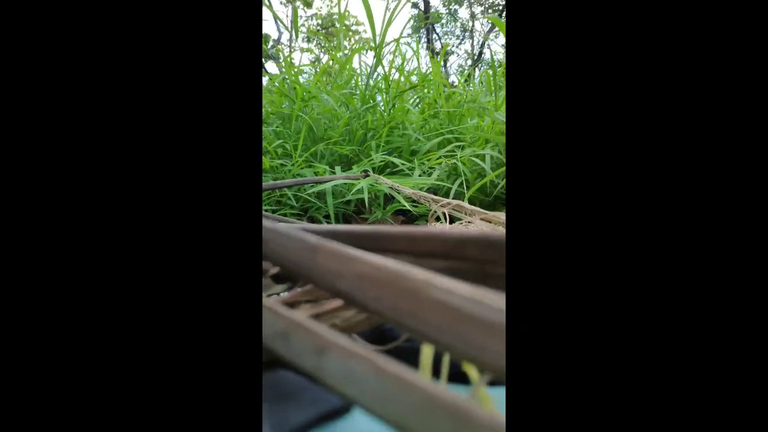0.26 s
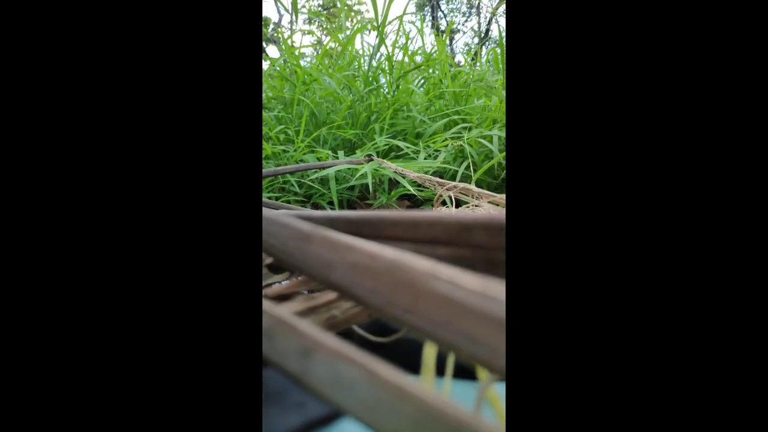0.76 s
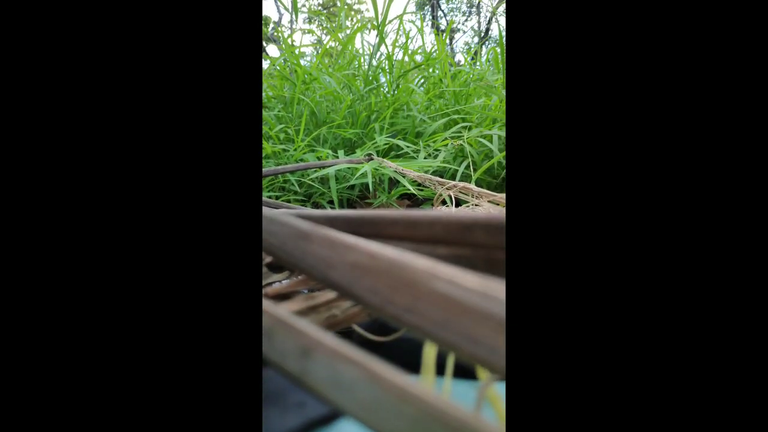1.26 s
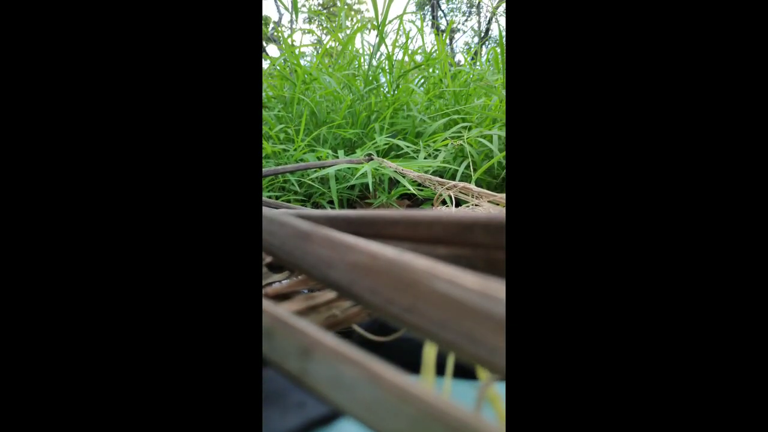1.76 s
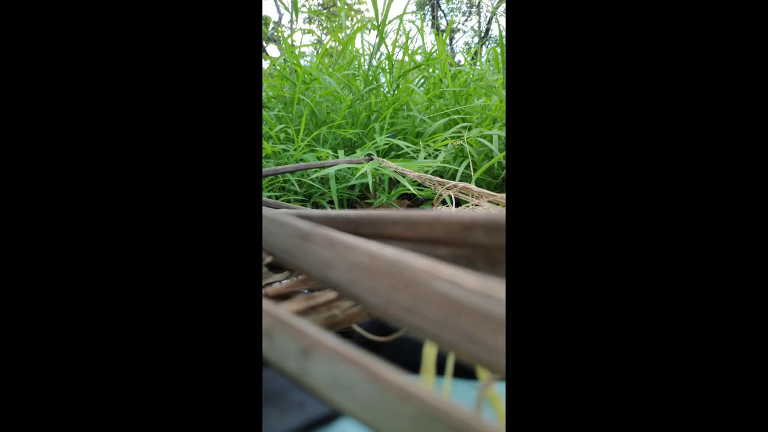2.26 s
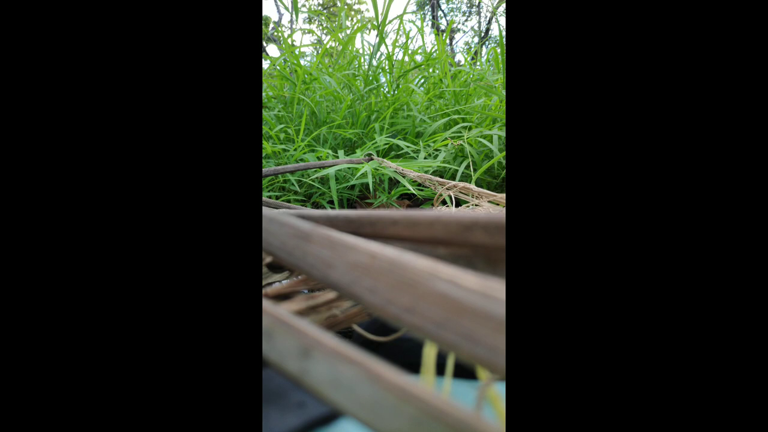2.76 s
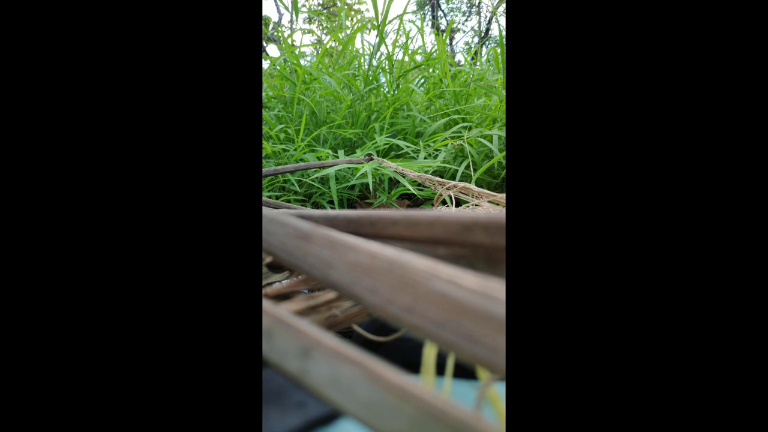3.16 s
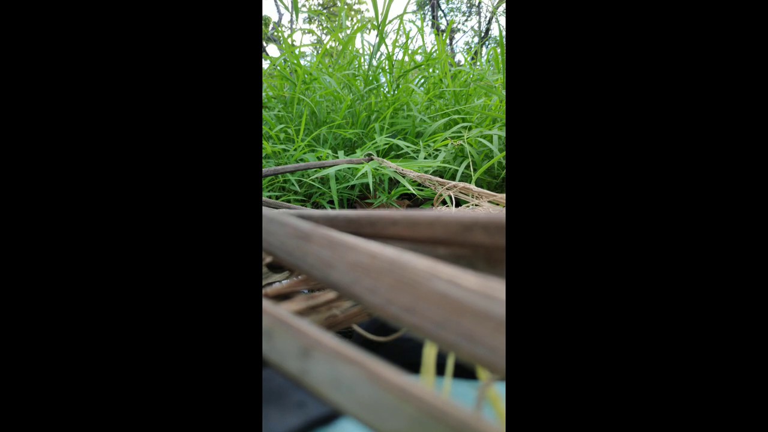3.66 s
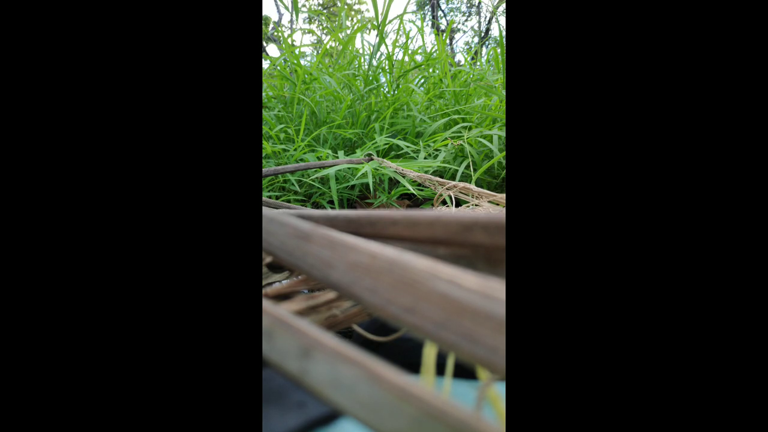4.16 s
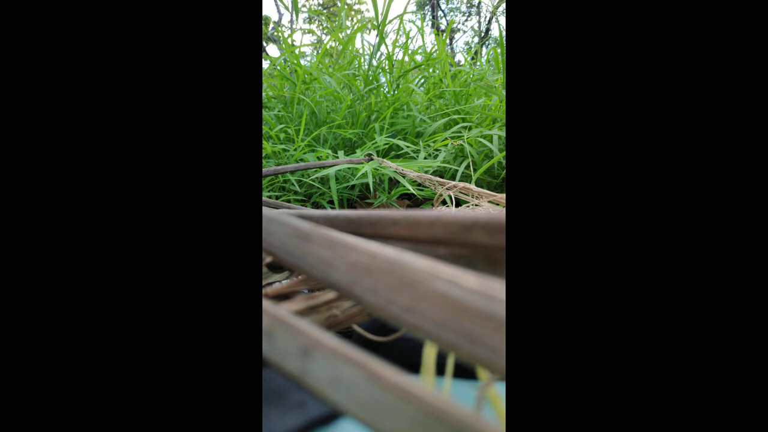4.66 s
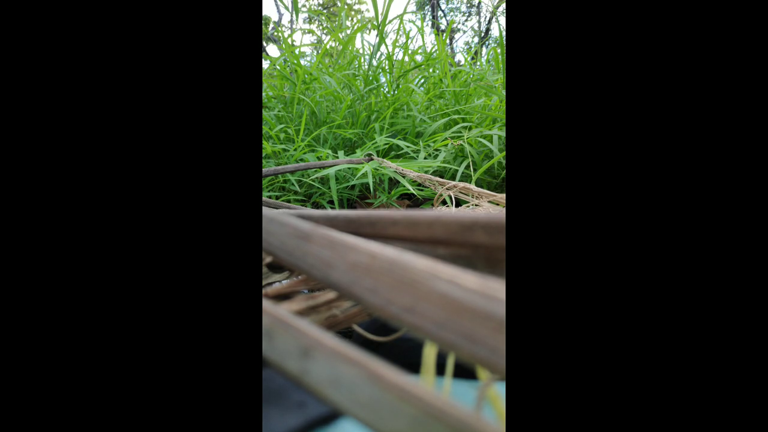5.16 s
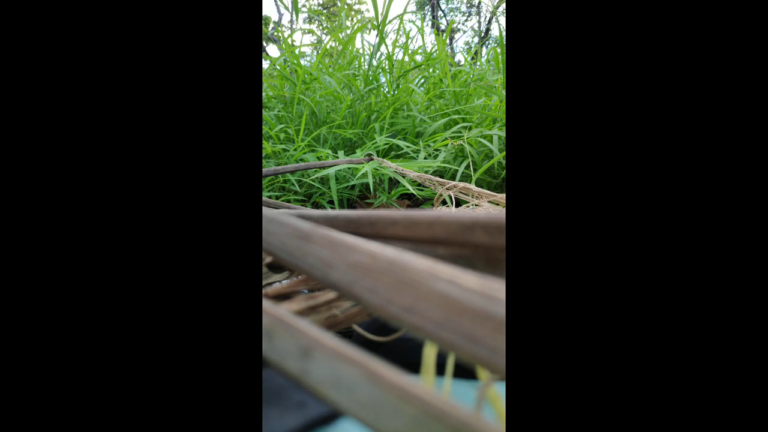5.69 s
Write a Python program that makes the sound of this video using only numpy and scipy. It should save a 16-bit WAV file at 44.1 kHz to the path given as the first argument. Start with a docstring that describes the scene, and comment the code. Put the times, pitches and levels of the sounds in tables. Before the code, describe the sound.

Bright, brittle leaf rustling at very close range, mostly left. After a brief squeaky brush and a small tap on the right, it stays faint, then surges in irregular strokes with sharp cracks and short woody knocks. Soft dull bumps come after 3 seconds. Movement dwindles to a few last clicks, leaving quiet outdoor hiss, low rumble and a thin insect buzz on the right.

```python
"""Dry palm fronds and grass are dragged about right beside the left port of a handheld microphone, outdoors.
Uneven bursts of noise make the sliding blades crackle; short tears of noise make blades snap and stalks knock.
A blade squeaks at the start with wavering harmonics, and one pressure pulse taps the right port.
Soft low sines bump under the heavy fronds. The movement dies away into a few last ticks.
Coloured noise makes the quiet open air, and narrow fluttering noise a faint insect."""
import sys
import numpy as np
from scipy import signal
from scipy.fft import rfft, irfft, next_fast_len
from scipy.io import wavfile

SR = 44100
rng = np.random.default_rng(int(sys.argv[2]) if len(sys.argv) > 2 else 0)


def to_wav(s):
    """Save 16-bit WAV."""
    ch = np.atleast_2d(s).T  # columns
    pcm = np.round(np.clip(ch, -1, 1) * 32767)  # PCM
    wavfile.write(sys.argv[1], SR, pcm.astype(np.int16))


N = 261513
CUTOFF_HZ = 15700  # top of the sound

# colour of the blades, relative levels:
# (pitch_hz [Hz], left_db brushing right at the left port [dB], air_db through the air [dB])
BLADE_COLOUR = [(1750, -28.5, -27), (3350, -23, -17.5), (5280, -16, -15), (7200, -7, -13.5),
                (8200, -11.5, -8.5), (8960, -4.5, -11.5), (10800, 0, -17), (13000, 2.5, -26),
                (15120, 1, -26), (16500, -17, -7.5)]
# ringing of a struck stalk: (pitch_hz [Hz], relative level_db [dB], t60_s time to fade by 60 dB [s])
STALK_RINGING = [(1070, -3.5, 0.0065), (1340, 3, 0.01), (1650, 4, 0.009), (1824, -5, 0.02),
                 (2380, -8, 0.016), (2640, -3.5, 0.021), (4360, -6, 0.0095)]


def from_db(db):
    """Decibels to gain."""
    return 10 ** (np.asarray(db) / 20)


def rms_one(x):
    """Scale to an average power of one."""
    return x / np.sqrt(np.mean(x ** 2) + 1e-20)


def in_time(rows):
    """Draw straight lines between a table's rows: each column's value at every sample."""
    s, *columns = np.transpose(rows)
    return [np.interp(np.arange(N) / SR, s, c) for c in columns]


def drift(rate_hz):
    """Smooth random wander of spread 1, mostly slower than rate_hz."""
    # computed at every tenth sample
    r = np.exp(-20 * np.pi * rate_hz / SR)
    noise = rng.standard_normal(N // 10 + 4002)
    slow = signal.lfilter([1], [1, -2 * r, r * r], noise)[4000:]  # drop the filter's start
    return np.interp(np.arange(N) / 10, np.arange(len(slow)), rms_one(slow))


def colour(x, spectrum):
    """Filter without pre-echo, one response per dB column; the first keeps the power of white noise."""
    hz, *columns = np.transpose(spectrum)
    size = 2 * next_fast_len(N // 2 + 4096)
    log_hz = np.log(np.arange(size // 2 + 1) * SR / size + 1)
    gain = from_db([np.interp(log_hz, np.log(hz), c) for c in columns])
    gain /= np.sqrt(np.mean(gain[0] ** 2 * (log_hz < np.log(CUTOFF_HZ))))
    # folding the cepstrum forward in time gives the phase that reacts soonest
    cepstrum = irfft(np.log(gain))
    cepstrum[:, 1:size // 2] *= 2
    cepstrum[:, size // 2 + 1:] = 0
    response = np.exp(rfft(cepstrum))
    return irfft(rfft(x, size) * response)[..., :N]


def low_pass(x, hz):
    """Gentle second-order low-pass."""
    return signal.sosfilt(signal.butter(2, min(hz, .45 * SR), fs=SR, output="sos"), x)


def high_pass(x, hz, order):
    """Remove what lies below hz."""
    return signal.sosfilt(signal.butter(order, hz, "high", fs=SR, output="sos"), x)


def two_ports(pair, apart_hz):
    """Long waves reach both ports nearly alike, short ones differ."""
    mid, side = pair
    side = high_pass(side, apart_hz, order=1) * 0.9 + 0.049 * side
    return np.array([mid + side, mid - side]) / np.sqrt(2)


def ring(clicks, hz, t60):
    """A unit click sets a sine of height 1 ringing, fading by 60 dB in t60 seconds."""
    r, w = from_db(-60 / (t60 * SR)), 2 * np.pi * hz / SR
    return signal.lfilter([0, np.sin(w)], [1, -2 * r * np.cos(w), r * r], clicks + 1e-18)


def slips(per_s, spread_db, clump_db, clump_hz, t60):
    """Tiny catches of fibre on fibre, uneven and in clumps; each is a brief burst, different at each port."""
    sizes = from_db(spread_db * np.minimum(rng.exponential(1, N), 5))
    born = rng.random(N) < per_s / SR
    kicks = born * sizes ** 2 / per_s + 1e-18
    power = signal.lfilter([1], [1, -from_db(-120 / (t60 * SR))], kicks)
    clumps = from_db(clump_db * np.clip(drift(clump_hz), -2, 2))
    return rms_one(np.sqrt(power) * clumps * rng.standard_normal((2, N)))


def sliding():
    """Each stroke swells, holds and lets go, then the blades settle; the powers of overlapping strokes add."""
    # strokes of the sliding blades, levels relative: (start_s [s], attack_s [s], hold_s [s],
    # crackle_db [dB], stalk_db stalk rubbing [dB])
    strokes = [(-.047, 0.094, 0.012, -39.5, -54), (0.08, .015, 0.011, -37.5, -51),
               (0.146, 0.014, 0.037, -57, -60), (0.721, 0.17, 0.67, -49.5, -72.5),
               (1.095, 0.074, 0.13, -48, -80), (1.591, 0.025, 0.024, -32.5, -55),
               (1.641, 0.045, 0.012, -33.5, -53.5), (1.709, 0.062, .54, -40.5, -62),
               (1.843, 0.048, 0.11, -37.5, -57.5), (2.327, 0.15, 0.029, -30.5, -52),
               (2.479, 0.038, 0.011, -23.5, -47), (2.586, 0.038, 0.14, -40.5, -60.5),
               (2.778, 0.014, 0.011, -34.5, -59), (2.935, 0.085, 0.044, -42.5, -54),
               (3.304, 0.025, 0.043, -43, -54), (3.378, 0.26, 0.668, -38.5, -62.5),
               (3.719, 0.1, 0.05, -39, -59), (4.09, 0.023, 0.012, -35.5, -72),
               (4.401, 0.017, .18, -49, -65), (4.833, 0.058, 0.033, -57.5, -62.5),
               (4.654, 0.042, 0.38, -60.5, -73), (5.702, .015, 0.055, -62.5, -75)]
    release_db_per_s = 223.5  # a stroke dies this fast once the pull stops
    settling_db, settling_db_per_s = -20.5, 18  # disturbed blades go on stirring, faintly and ever less
    t = np.arange(0, N, 20) / SR
    power = np.full((2, len(t)), 1e-10)
    for start, attack, hold, crackle_db, stalk_db in strokes:
        swell = np.clip((t - start) / attack, 0, 1)
        since = np.maximum(t - start - attack - hold, 0)
        release = from_db(-release_db_per_s * since) ** 2
        settling = from_db(settling_db - settling_db_per_s * since) ** 2
        power += (from_db([[crackle_db], [stalk_db]]) * swell) ** 2 * (release + settling)
    return in_time(np.column_stack([t, *(10 * np.log10(power))]))


def blade_colours(catches, count):
    """A few blades touch at any moment; each favours a broad band until another takes its place."""
    shades = 0
    for _ in range(count):
        contact = np.cumsum(rng.random(N) < 1 / (.02 * SR))  # a new blade every 0.02 s on average
        hz = rng.uniform(5000, 15500, 2000)[contact % 2000]
        # shift the band down to zero, smooth it, and shift it back up
        turn = np.exp(2j * np.pi * np.cumsum(hz) / SR)
        shades = shades + (low_pass(catches / turn, 900) * turn).real
    return rms_one(shades)


def rustle():
    """Harder sliding makes more and louder slips; stalks carry their lower part and ring with coarse ones."""
    # where the blades slide: (start_s [s], left_db balance, higher is nearer the left port [dB])
    blade_side = [(0, 14.5), (0.2, 5), (0.7, 8), (1.2, 10), (1.9, 7), (2.5, 13), (2.9, 14), (3.15, 3),
                  (3.7, 16.5), (4.3, 13.5), (4.8, 7), (5.9, 15)]
    # where the stalks rub: (start_s [s], left_db left minus right [dB])
    rub_side = [(0, -4.5), (.25, -7), (1.6, 12.5), (2.2, 6), (2.5, 4.5), (5.9, 3)]
    # colour of a rubbed stalk: (pitch_hz [Hz], relative level_db [dB])
    rub_colour = [(100, -6.5), (300, -13.5), (600, -6), (1400, 3), (2200, 2.5), (4000, -4.5), (9000, -30)]
    crackle_db, stalk_db = sliding()
    left_db, = in_time(blade_side)
    side_db, = in_time(rub_side)
    per_s = 4000 * from_db(0.44 * (crackle_db + 41.5))

    catches = slips(per_s, spread_db=0.5, clump_db=1.65, clump_hz=55.7, t60=0.0099)
    # blade tips flick free among the fine slips
    flicks = slips(83, spread_db=2.1, clump_db=0, clump_hz=10, t60=.004)
    catches = rms_one(catches + 0.33 * blade_colours(catches, count=4) + from_db(-13.5) * flicks)
    close = colour(catches[0], BLADE_COLOUR)[0] * from_db(crackle_db + 1.0 - 0.34 * left_db)
    through_air = colour(catches[:, None], BLADE_COLOUR)[:, 1] * from_db(crackle_db - left_db + 13.5)

    # blades right on the left port make its cavity hiss
    cavity_slips = slips(per_s, spread_db=4.5, clump_db=3.0, clump_hz=43.7, t60=0.0032)[0]
    cavity = rms_one(ring(cavity_slips, hz=11350, t60=0.00083))
    cavity = high_pass(cavity, 9000, order=2)
    close = close + cavity * from_db(crackle_db + left_db - 15.0)

    rub_slips = slips(per_s / 2, spread_db=2.5, clump_db=3.0, clump_hz=44.0, t60=0.0064)
    rubs = two_ports(rub_slips, apart_hz=945)
    ringing = 0
    for hz, mode_db, t60 in STALK_RINGING:
        ringing = ringing + from_db(mode_db + 6.1 * drift(5.9)) * ring(rubs, hz, t60)
    stalks = colour(rubs, rub_colour) + 0.8 * rms_one(ringing)
    stalks = stalks * from_db(stalk_db - 3 + np.array([side_db, -side_db]) / 2)
    return np.array([close + 0.71 * through_air[0], through_air[1]]) + stalks


def squeak():
    """A blade sticks and slips unsteadily; upper harmonics waver most and fade first, and each slip rasps."""
    # the squeak's course: (start_s [s], pitch_hz slips per second [Hz], relative level_db [dB])
    course = [(0, 1950, -34), (.007, 1627, -36), (.02, 1550, -31.5), (.031, 1664, -33.5),
              (.052, 1655, -30.5), (.061, 1800, -33.5), (.068, 1980, -42), (.075, 1950, -90)]
    # its harmonics, from the first up, relative levels: (left_db [dB], right_db [dB])
    harmonics = [(-6, -2), (-12.5, -9.5), (-20, -12.5), (-20, -21), (-21, -15.5), (-15.5, -18), (-9.5, -24),
                 (-7, -26)]
    lag_s = .00027  # it reaches the right port this much later than the left
    hz, level_db = in_time(course)
    unsteady_hz = hz * (1 + .02 * drift(370))
    cycles = np.cumsum(unsteady_hz) / SR - hz * np.array([[0], [lag_s]])
    phase = 2 * np.pi * cycles
    tones = 0
    for k, ports_db in enumerate(harmonics, 1):
        rough = min(k / 3, 1)
        wavering_db = rough * (3.5 * drift(250) + .4 * (level_db - level_db.max()))
        gain = from_db(np.array(ports_db)[:, None] + wavering_db)
        tones = tones + np.sin(k * phase + .6 * rough * drift(500)) * gain
    # friction noise swells once per slip
    friction = rng.standard_normal((2, N)) * (1 + np.cos(phase))
    rasp = rms_one(ring(friction, hz=4400, t60=0.0021)) * from_db(-18)
    sounding = level_db > level_db.min()
    return (np.sqrt(2) * tones + rasp) * from_db(level_db) * sounding


def open_air():
    """Distant rumble and a faint hiss: coloured noise, more alike at both ports the lower it is."""
    # colour of the open air, relative levels: (pitch_hz [Hz], left_db [dB], right_db [dB])
    air_colour = [(25, -2.5, 4), (113, 0.5, -1.5), (204, -6.5, -7), (510, -10.5, -13), (1400, -12.5, -21.5),
                  (2650, -19.5, -20), (6140, -24, -25), (11700, -21, -25.5), (15000, -24.5, -37)]
    return from_db(-61) * colour(two_ports(rng.standard_normal((2, N)), apart_hz=940), air_colour)


def insect():
    """A thin, fluttering buzz off to the right: noise rung twice at one pitch."""
    # a far insect: (start_s [s], level_db at the right port [dB])
    insect_course = [(0, -68), (1.0, -69.5), (1.6, -62), (5.1, -75), (5.3, -66.5), (5.42, -82)]
    pitch_hz, t60_s, flutter_db = 7090, 0.0054, 3.5
    level_db, = in_time(insect_course)
    once = ring(rng.standard_normal((2, N)), pitch_hz, t60_s)
    buzz = ring(once, pitch_hz, t60_s)
    flutter = from_db(flutter_db * drift(45))
    return rms_one(buzz * flutter) * from_db([level_db - 10, level_db])


def tearing(t60):
    """Fibres give way in turn: quick build-up, tearing tail, faint leaf scatter; unit energy at each port."""
    rise_share = 0.07  # time constant of the build-up, as a share of the dying time
    t = np.arange(SR // 20) / SR
    build_up = -np.expm1(-t / (rise_share * t60))
    tail = from_db(-60 * t / t60)
    scatter = 0.048 * from_db(-60 * t / 0.071)
    tear = rng.standard_normal((2, len(t))) * build_up * (tail + scatter)
    return tear / np.linalg.norm(tear, axis=1, keepdims=True)


def add(track, s, sound):
    """Mix a sound into both ports at time s."""
    start = int(s * SR)
    track[:, start:start + sound.shape[1]] += sound[:, :N - start]


def crack(tear, crack_db, left_db):
    """The tear sets its blade ringing for a few milliseconds, higher the nearer it is to the left port."""
    hz = min(8500 + 292 * left_db, 13000)
    sound = rms_one(tear) + 0.34 * rms_one(ring(tear, hz, t60=0.0029))
    sound = sound / np.linalg.norm(sound, axis=1, keepdims=True)
    return sound * from_db([[crack_db + 21.0], [crack_db + 20.0 - left_db]])


def stalk_ring(tear, stalk_db, ring_hz, scrape_s):
    """A brief blow thuds and excites every mode; a longer scrape makes the stalk sing near one pitch."""
    t = np.arange(tear.shape[1]) / SR
    off_ring_db = 1500 * scrape_s  # loss per octave away from the strongest ring
    # a blow also bends the stalk: a dead, woody thud, weaker in long scrapes
    thud_db, thud_hz, thud_t60_s = 7, 905, 0.0044
    thud_level_db = stalk_db + thud_db - off_ring_db / 2
    thud = np.cos(2 * np.pi * thud_hz * t) * from_db(thud_level_db - 60 * t / thud_t60_s)
    out = high_pass(thud, 400, order=2) * from_db([[0], [-3]])
    for hz, mode_db, t60 in STALK_RINGING:
        octaves_off = min(abs(np.log2(hz / ring_hz)), .5)
        level_db = stalk_db + mode_db + 6.0 - off_ring_db * octaves_off
        cycles = hz * rng.normal(1, 0.01) * t + rng.random()
        mode = np.sin(2 * np.pi * cycles) * from_db(level_db - 60 * t / t60)
        # the tear goes on exciting the mode
        mode = mode + 0.75 * signal.fftconvolve(mode, tear[0])[:len(t)]
        out = out + np.array([mode, 0.24 * np.roll(mode, 10)])  # the far port hears it later
    return out


def snaps():
    """Blades crack on their own; stalks crack and ring as they knock together."""
    # dry blades snapping: (start_s [s], relative crack_db [dB], left_db balance, higher is nearer left [dB])
    blade_snaps = [(0.088, -40, 18), (0.0955, -26.5, 16), (0.456, -46.5, 4.5), (1.3453, -37.5, 5.5),
                   (1.6165, -30, 15), (2.55, -19.5, 15), (2.585, -27.5, 14.5), (2.5887, -18, 13),
                   (2.638, -27.5, 15), (2.7315, -37, 22), (2.7345, -39, 26), (2.881, -33.5, 17),
                   (2.9212, -35.5, 13), (2.946, -35, 14.5), (3.056, -19, 15), (3.067, -33, 10),
                   (3.075, -33.5, 5), (3.0858, -33, 6), (3.12, -31, 12), (3.183, -41, 17),
                   (3.194, -32, 13.5), (3.2274, -30.5, 15), (4.016, -31.5, 21), (4.0905, -26.5, 26),
                   (4.4701, -30, 13), (4.6026, -38, 13), (4.6075, -46, 20), (4.672, -35.5, 14),
                   (4.718, -40.5, 12), (4.85, -42.5, 2), (4.875, -39.5, 13), (4.976, -45.5, 10.5),
                   (5.0418, -44, 9.5), (5.227, -50, 15), (5.655, -49, 14), (5.7125, -41, 14),
                   (5.715, -44, 16), (5.727, -39, 14), (5.7413, -48, 6)]
    # stalks knocking together, levels relative: (start_s [s], crack_db [dB], stalk_db [dB],
    # left_db balance of the crack [dB], ring_hz strongest ring [Hz], scrape_s t60 of the scraping [s])
    stalk_knocks = [(0.161, -53, -46, 9, 1300, .02), (1.366, -56, -39, -2, 1070, .04),
                    (1.6035, -44, -49, 9, 1400, 0.02), (1.6104, -31.5, -51, 18, 1000, 0.0044),
                    (1.628, -30.5, -40.5, 10, 1624, 0.032), (1.6844, -28.5, -36.5, 5, 1690, 0.027),
                    (1.7112, -40, -39, 12, 1000, 0.008), (3.0428, -45, -44, 10, 1300, .025),
                    (3.1143, -25.5, -36.5, 2.5, 1620, 0.009), (3.1318, -29, -33.5, 2, 1160, 0.012),
                    (3.1468, -35.5, -31, -0.5, 1700, 0.028), (3.2404, -30.5, -43.5, 12.5, 2330, 0.0054),
                    (3.378, -35.5, -36, 10, 2100, 0.004), (4.3482, -26.5, -44.5, 12.5, 1890, 0.0044),
                    (4.6183, -50, -50, 14, 1100, .008), (4.658, -31, -37.5, 4.5, 1070, 0.029),
                    (4.8794, -37.5, -57, 8.5, 1060, .004), (4.893, -55, -46.5, 17, 1400, .007),
                    (4.909, -44, -45, 8, 1200, .006), (4.9134, -40, -42, 8, 1880, 0.0067),
                    (4.924, -45, -49.5, 11, 1300, 0.006), (5.444, -44.5, -54, 6, 4450, 0.014)]
    cracks, rings = np.zeros((2, 2, N))
    for s, crack_db, stalk_db, left_db, ring_hz, scrape_s in stalk_knocks:
        tear = tearing(scrape_s)
        add(cracks, s, crack(tear, crack_db, left_db))
        add(rings, s, stalk_ring(tear, stalk_db, ring_hz, scrape_s))
    for s, crack_db, left_db in blade_snaps:
        add(cracks, s, crack(tearing(0.0046), crack_db, left_db))
    # left takes the close colour, right the colour through the air
    return colour(cracks, BLADE_COLOUR) * from_db([[0], [12]]) + rings


def port_tap():
    """Pressure swells as the port is covered, flips on release and recovers within about two milliseconds."""
    # tap on the right port: (start_s moment of release [s], level_db before smoothing [dB])
    tap = (.2998, -12)
    s, level_db = tap
    t = np.arange(N) / SR - s
    covered = .85 * np.exp(-np.abs(t) / .0009)
    released = -np.exp(-(t / .001) ** 2)
    pressure = np.where(t < 0, covered, released)
    return low_pass(pressure, hz=10500) * from_db([[level_db - 49], [level_db]])


def bumps():
    """Dull, quickly damped thuds: low sines that fade at once."""
    # soft bumps of the heavy fronds: (start_s [s], level_db at the left port before fading [dB],
    # pitch_hz [Hz], t60_s [s])
    soft_bumps = [(3.349, -45.5, 131, 0.069), (3.363, -45.5, 121, 0.1), (3.394, -41.5, 99, 0.075),
                  (4.906, -38, 146, 0.044)]
    t = np.arange(N) / SR
    out = np.zeros(N)
    for s, level_db, hz, t60 in soft_bumps:
        age = np.maximum(t - s, 0)
        out += np.sin(2 * np.pi * hz * age) * from_db(level_db - 60 * np.minimum(age / t60, 5))
    return out * from_db([[0], [-2]])


def scene():
    """Everything at the two ports."""
    return rustle() + squeak() + open_air() + insect() + snaps() + port_tap() + bumps()


def record(dry):
    """The top is cut steeply."""
    return signal.sosfilt(signal.ellip(10, .1, 80, CUTOFF_HZ, fs=SR, output="sos"), dry)


dry = scene()
out = record(dry)
to_wav(out)
```